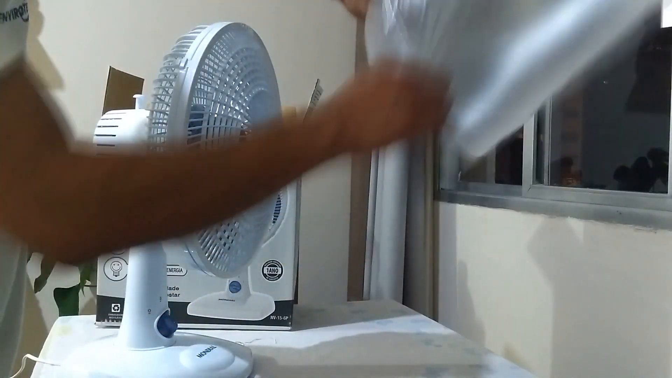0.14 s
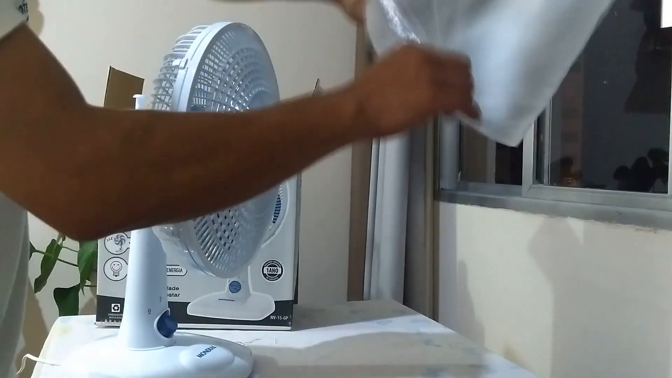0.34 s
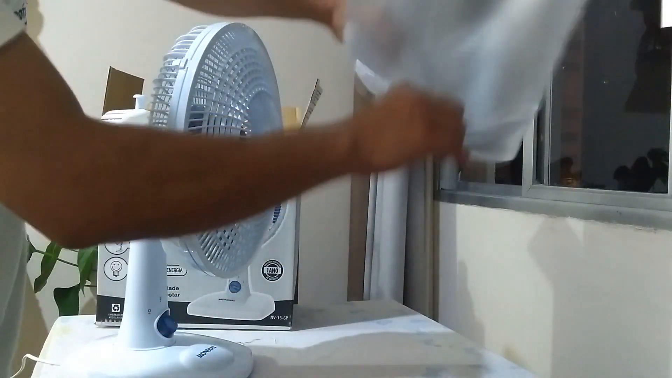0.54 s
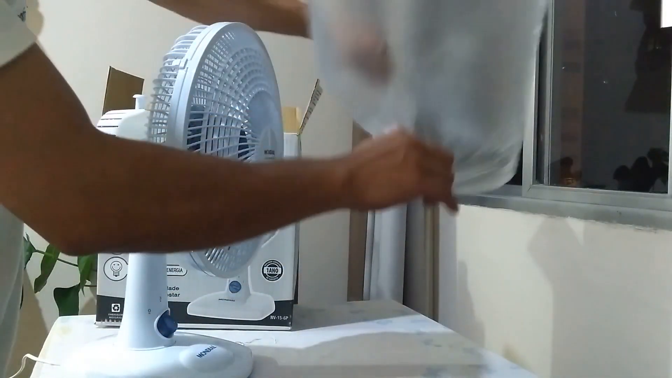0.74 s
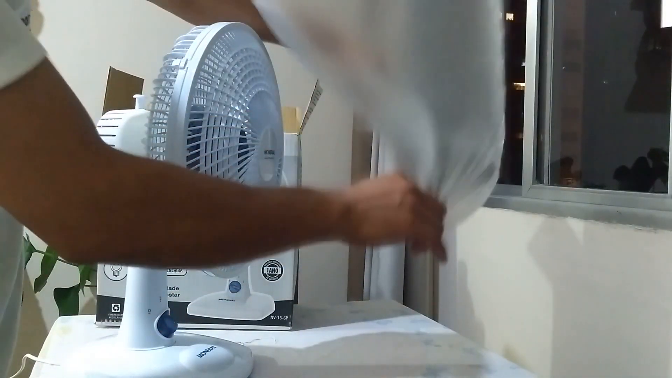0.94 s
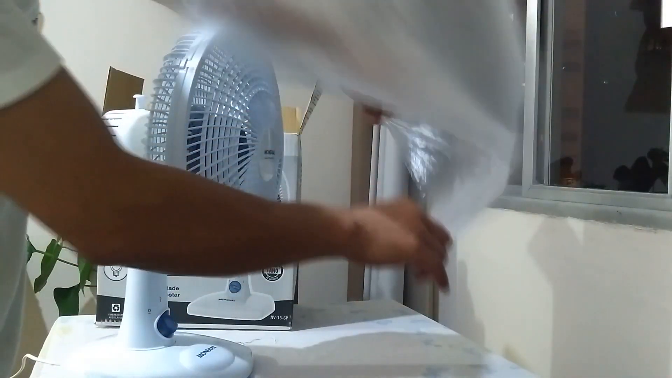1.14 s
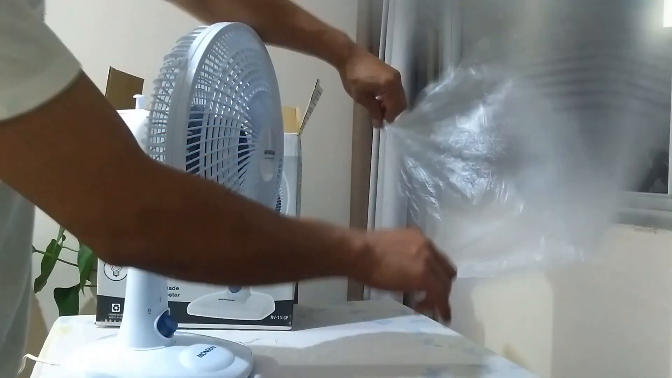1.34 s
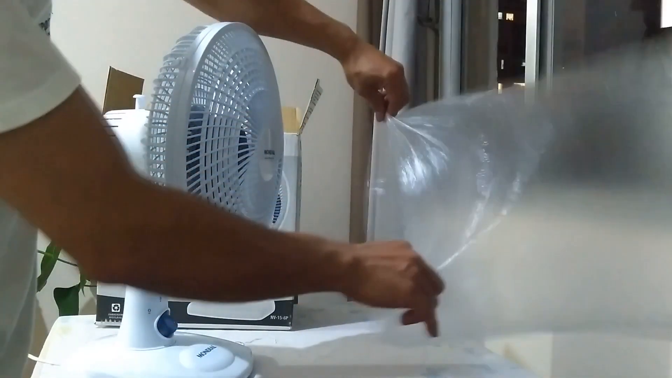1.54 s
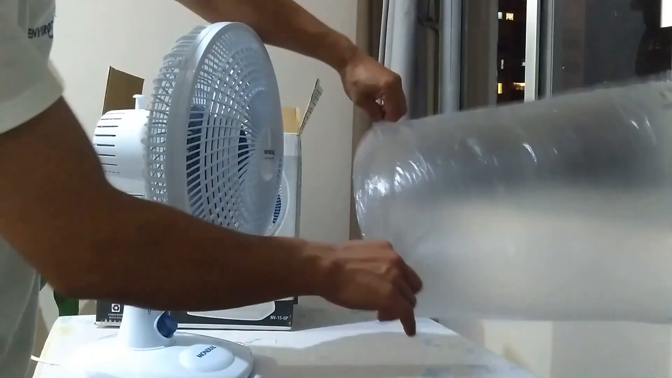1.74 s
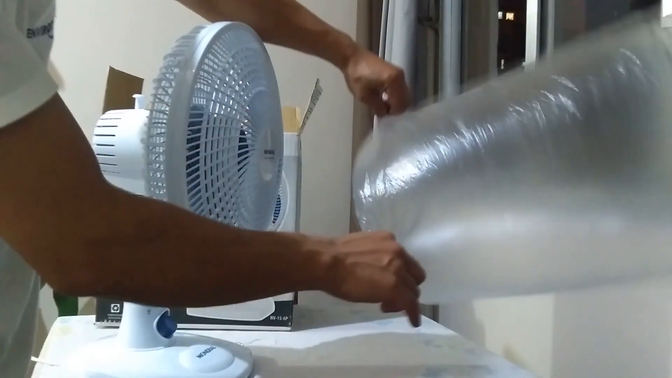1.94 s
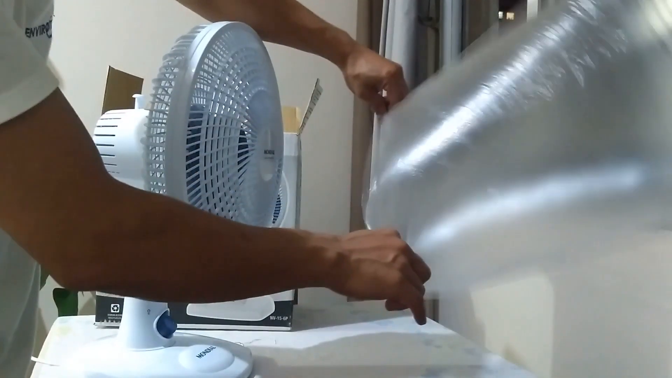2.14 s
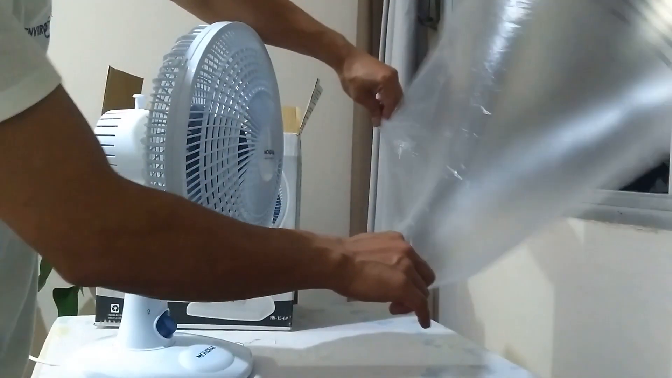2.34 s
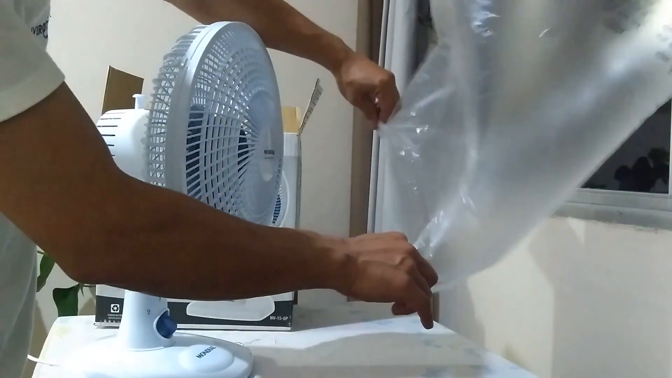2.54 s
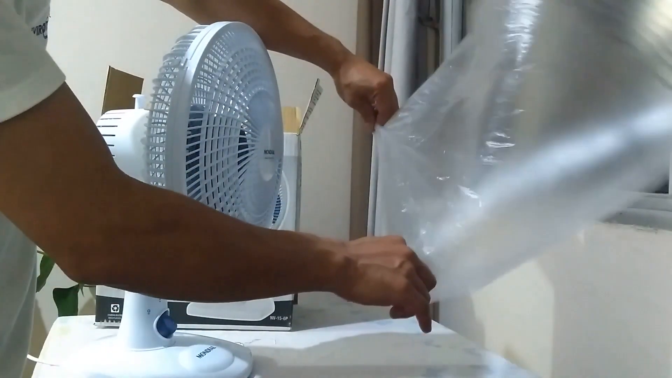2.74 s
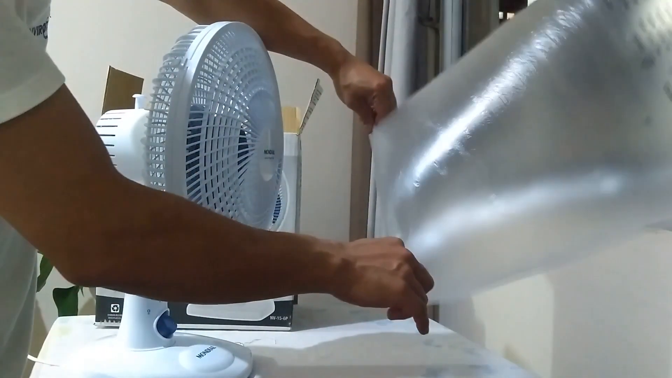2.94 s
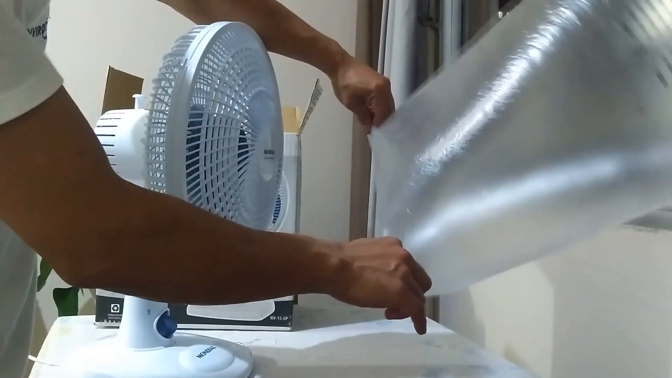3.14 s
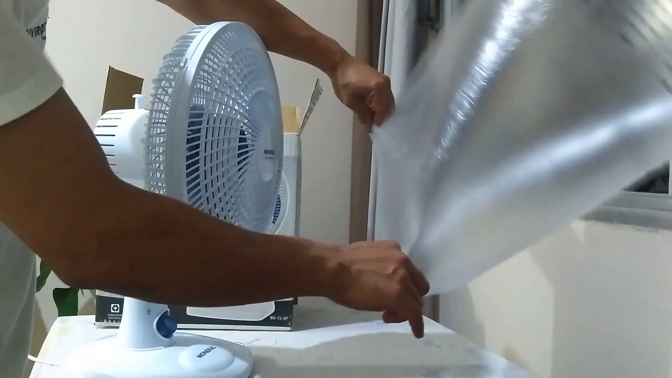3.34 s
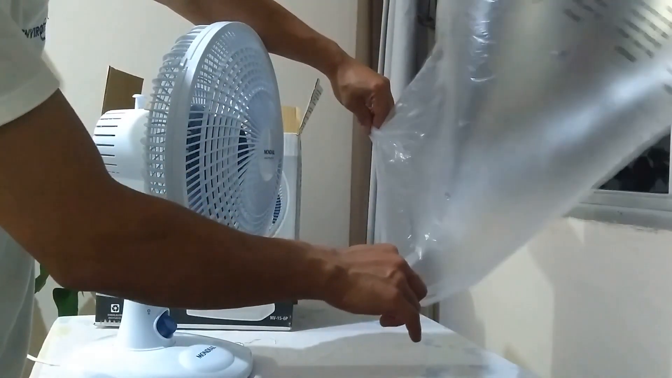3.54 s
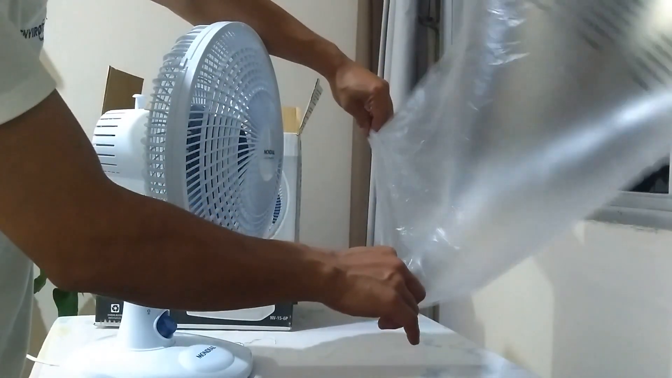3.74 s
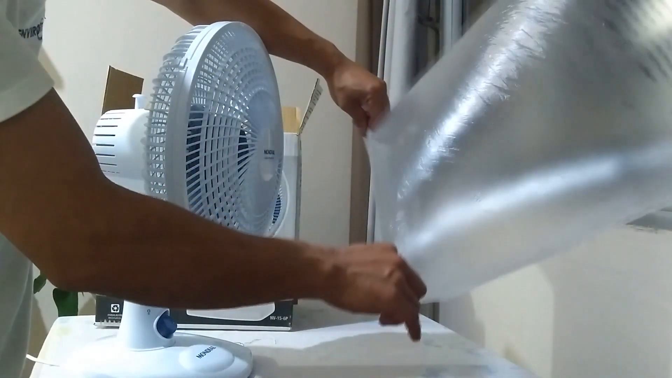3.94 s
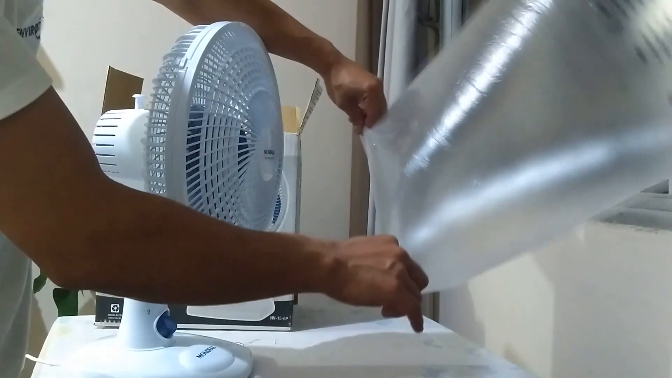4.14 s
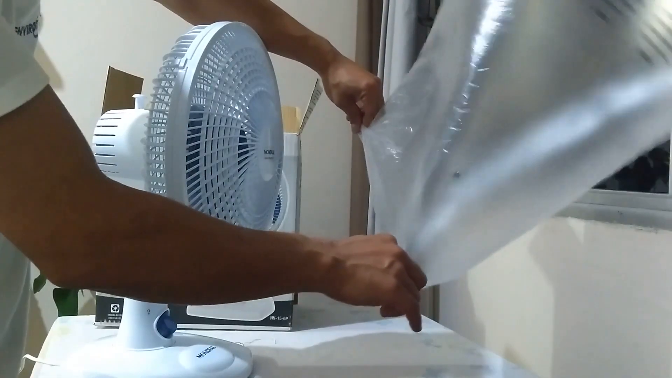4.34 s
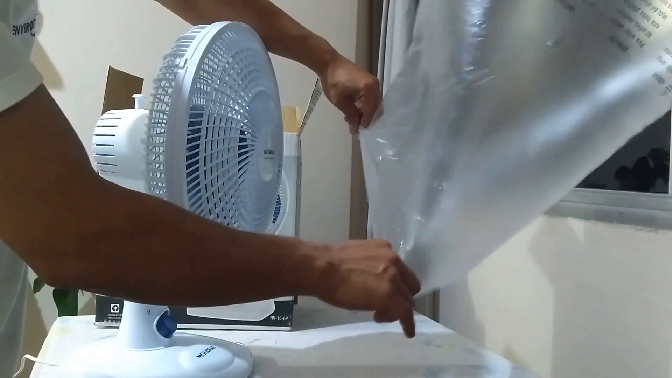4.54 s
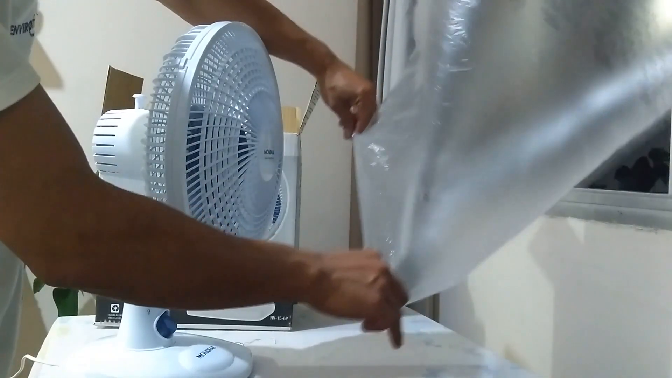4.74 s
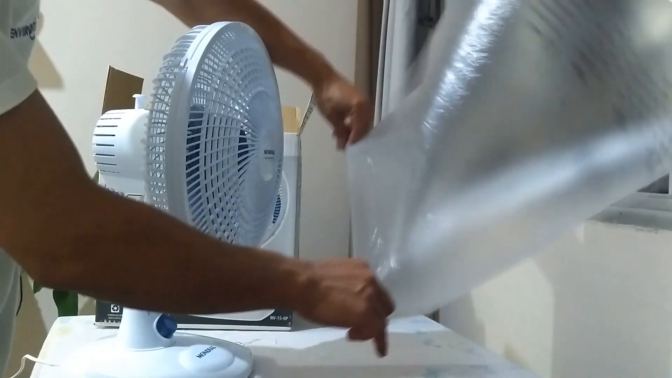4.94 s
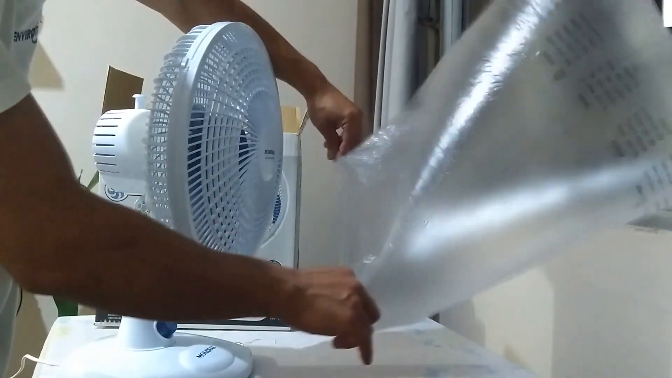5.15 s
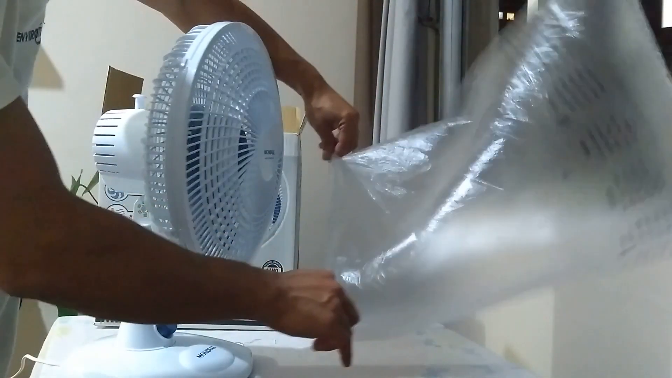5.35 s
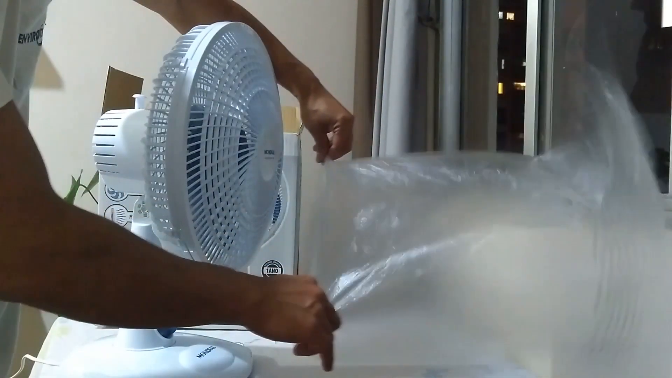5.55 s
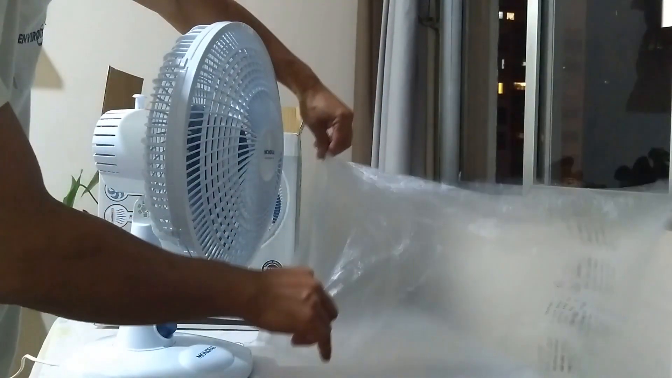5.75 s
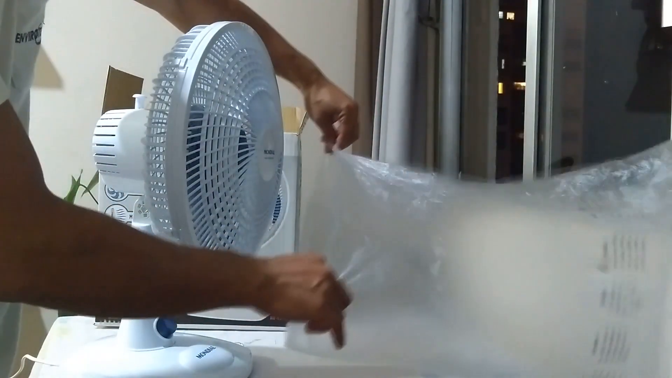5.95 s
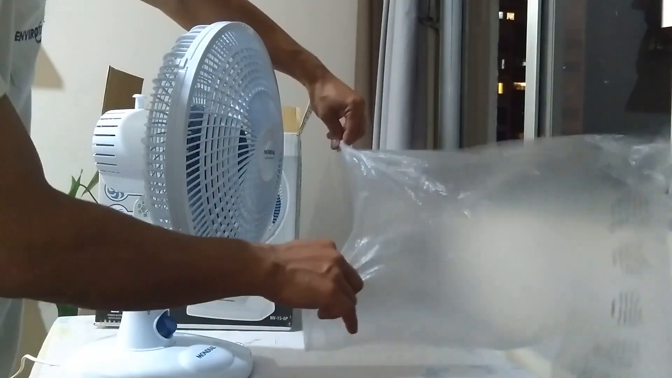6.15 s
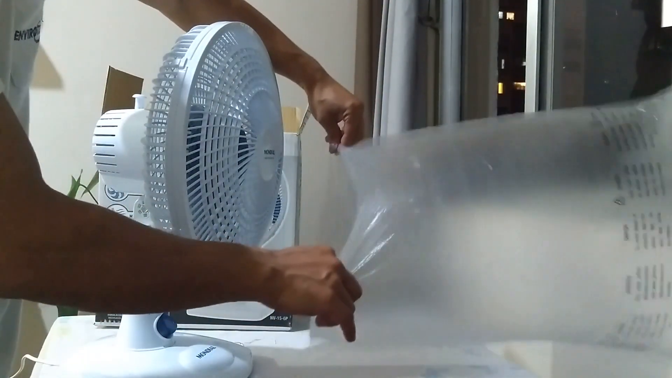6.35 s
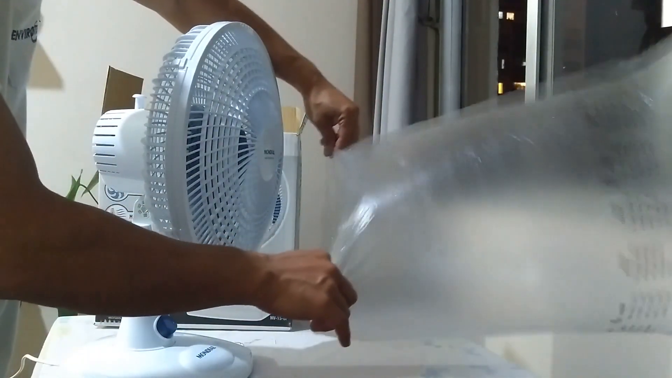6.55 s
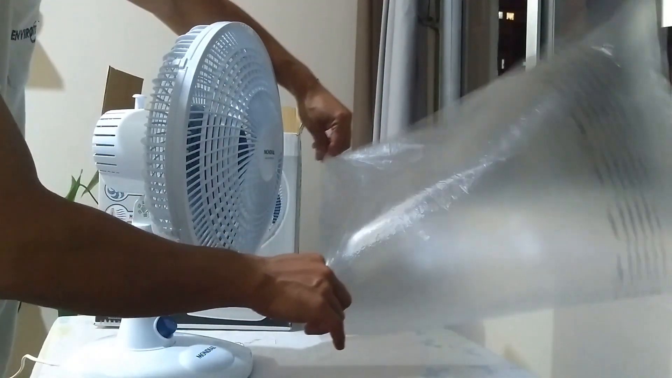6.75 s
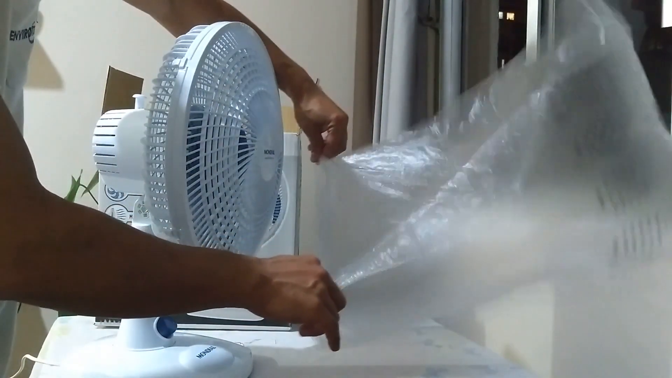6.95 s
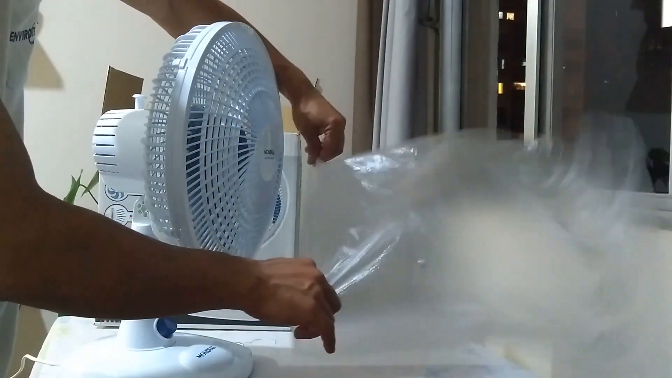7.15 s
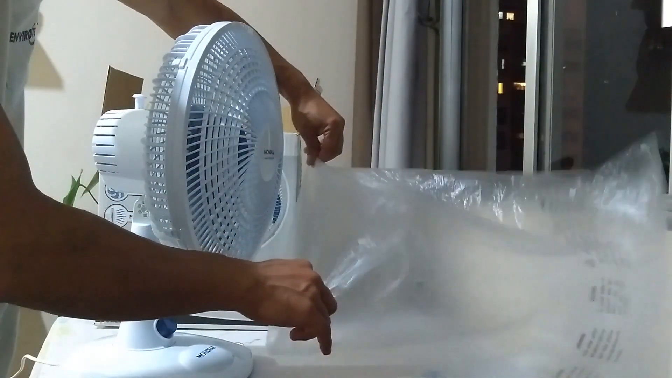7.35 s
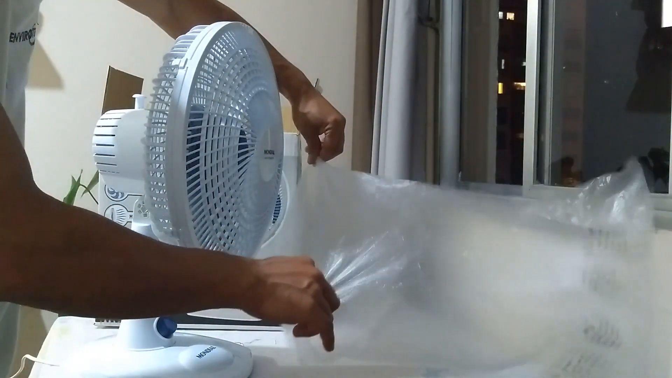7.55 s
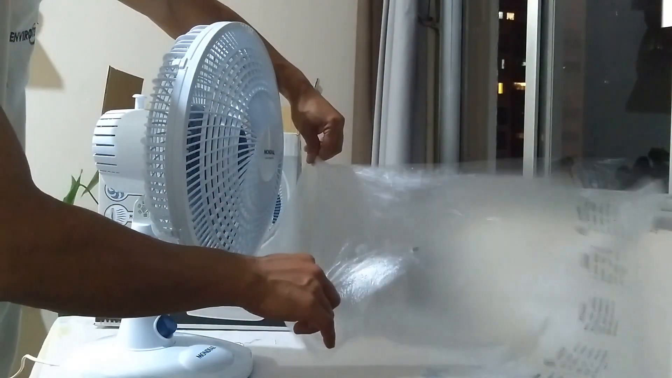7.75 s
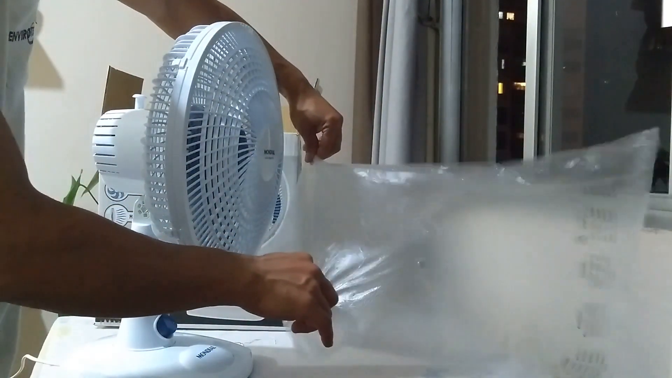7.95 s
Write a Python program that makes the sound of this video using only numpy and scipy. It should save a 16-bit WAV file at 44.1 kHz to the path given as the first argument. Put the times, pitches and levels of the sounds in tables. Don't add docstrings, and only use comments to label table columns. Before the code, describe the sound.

In a small room, a desk fan at full speed makes a constant airy rush and low blade hum. Close by, hands stretch a thin plastic bag in the draught: bright crinkling, a big billowing burst early on, lighter flutter, then a very sharp snap near the end. A distant motorbike revs faintly outside. Wide stereo, close microphone.

```python
import sys
import numpy as np
from scipy import signal
from scipy.fft import rfft, irfft, next_fast_len
from scipy.io import wavfile
from scipy.ndimage import uniform_filter1d

SR = 44100
rng = np.random.default_rng(int(sys.argv[2]) if len(sys.argv) > 2 else 0)


def magnitude_from_level(level_db):
    exponent = np.asarray(level_db, float) / 20
    return 10 ** exponent


def master_out(mix):
    frames = np.transpose(np.atleast_2d(mix))
    ceiling = np.clip(frames, -1, 1)
    pcm = np.round(ceiling * 32767).astype(np.int16)
    wavfile.write(sys.argv[1], SR, pcm)


N = 353285

# peak t/s, extra rustle level/dB, rise t/s, fall t/s
BILLOWS = [(.15, 9, 0.073, .07), (.36, 5, 0.027, 0.043), (.45, 8, 0.031, 0.087), (.67, 4.5, 0.064, .09),
           (1.38, 4, 0.036, 0.041), (1.59, 22, 0.14, 0.42), (1.65, 24.5, 0.17, 0.19), (1.76, 20, .3, .08),
           (2.25, 3, 0.3, 0.033), (2.97, 4, .05, 0.15), (3.68, 2.5, 0.053, .15), (3.41, 8.5, 0.12, 0.21),
           (3.9, 9.5, .021, 0.098), (4.01, 4.5, .06, 0.049), (4.4, 1.5, .07, 0.11), (4.53, 5, 0.16, 0.032),
           (4.86, 1.5, .1, 0.042), (5.06, 3.5, 0.12, 0.11), (5.47, 6, 0.06, 0.065), (5.78, 12.5, .3, 0.9),
           (6.0, 15, .3, 0.29), (6.38, 8.5, 0.42, 0.23), (7.09, 5.5, 0.1, 0.2), (7.46, 3, 0.45, 0.1),
           (7.72, 2, .09, .05), (7.94, 6.5, 0.096, 0.12)]
# f/Hz, likeness (0 to 1)
PORT_SAME = [(30, 0.92), (60, 0.94), (250, 0.9), (500, 0.81), (1000, 0.26), (1800, 0.31), (4000, 0.16)]
# f/Hz, left over right level/dB
PORT_LEFT = [(60, 0), (500, 3), (1800, -6.5), (3700, -2), (4700, -7.5), (6500, -8), (9000, -3.5),
             (14000, -2.5)]


def evened(x):
    return x / np.sqrt(np.mean(x ** 2) + 1e-20)


def read(points, hz):
    f, value = np.transpose(points)
    return np.interp(np.log(hz + 1), np.log(f + 1), value)


def curve(rows):
    s, *columns = np.transpose(rows)
    return [np.interp(np.arange(N) / SR, s, c) for c in columns]


def bumps(rows, t):
    s, db, rise, fall = np.transpose(rows)[..., None]
    rising, falling = 1 + (t - s) / rise, 1 - (t - s) / fall
    return (db * np.clip(np.minimum(rising, falling), 0, 1)).max(0)


def colour(x, points):
    size = next_fast_len(N + 4096)
    gain = magnitude_from_level(read(points, np.fft.rfftfreq(size, 1 / SR)))
    return irfft(rfft(x, size) * evened(gain), size)[..., :N]


def wander(rate_hz, channels=1):
    lowpass = signal.butter(2, rate_hz, fs=SR, output="sos")
    return evened(signal.sosfilt(lowpass, rng.standard_normal((channels, N))))


def creases(per_s, spread_db, low_hz, high_hz, cycles):
    happens = None
    size = magnitude_from_level(spread_db * np.minimum(rng.exponential(1, N), 5)) * (rng.random(N) < per_s / SR)
    kind, sign, out = rng.integers(0, 10, N), rng.choice([-1., 1.], (2, N)), np.zeros((2, N))
    t = np.arange(400) / SR
    for k, hz in enumerate(np.geomspace(low_hz, high_hz, 10)):
        burst = np.sin(2 * np.pi * hz * t) * np.exp(-t * hz / cycles) * (1 - np.exp(-t * hz * 3.3))
        burst = burst / np.linalg.norm(burst) * np.sqrt(hz)
        out += signal.oaconvolve(size * (kind == k) * sign, burst[None], axes=1)[:, :N]
    return evened(out)


def cracks():
    # t/s, peak level/dB, low ring f/Hz
    flips = [(1.5654, -18, 700), (1.5883, -22, 1290), (1.5984, -12, 970), (1.6520, -15, 300),
             (2.9629, -24, 1020), (3.9038, -17, 910), (4.0185, -25, 1200), (6.3225, -22, 845),
             (7.0963, -19, 1500), (7.1039, -6.5, 1710), (7.109, -27, 1400), (7.4346, -19, 1450)]
    out, t = np.zeros((2, N)), np.arange(300) / SR
    bright = .6 * np.sin(2 * np.pi * 5600 * t) * np.exp(-t / .0007)
    for s, db, hz in flips:
        ring = np.sin(2 * np.pi * hz * t) * np.exp(-t / .0011) + bright
        out[:, round(s * SR):][:, :300] += magnitude_from_level(db) * ring * [[1], [.8]]
    return out


def room(x, wet_db):
    # f/Hz, t60/s
    decay = [(200, 0.37), (1000, 0.19), (4000, 0.09), (12000, 0.18)]
    taps = np.zeros((3, 2, SR // 4))
    at = np.arange(100, SR // 4 - 20, 20) + rng.integers(0, 20, (3, 2, (SR // 4 - 101) // 20))
    np.put_along_axis(taps, at, rng.choice([-1., 1.], at.shape), 2)
    hz, t, z = signal.stft(taps, SR, nperseg=256)
    tails = signal.istft(z * magnitude_from_level(-60 * t / read(decay, hz)[:, None]), SR, nperseg=256)[1]
    tails = tails / np.linalg.norm(tails[0, 0])
    turn = 2 * np.pi * (2.3 * np.arange(N) / SR + np.arange(3)[:, None, None] / 3)
    wet = signal.fftconvolve(x * np.cos(turn) * np.sqrt(2 / 3), tails, axes=2).sum(0)[:, :N]
    return (x + magnitude_from_level(wet_db) * wet) / np.sqrt(1 + magnitude_from_level(2 * wet_db))


def bag():
    # t/s, level/dB
    rustle = [(0.0, -39), (0.3, -49), (0.76, -50.5), (0.89, -39.5), (1.43, -40.5), (1.85, -56),
              (2.12, -50.5), (2.45, -38), (2.92, -38.5), (3.2, -44), (3.6, -41.5), (4.2, -41.5),
              (4.95, -41.5), (5.3, -37), (6.17, -41.5), (7.0, -37), (7.63, -34.5), (8.01, -32)]
    # t/s, peak level/dB, low slap against crinkle level/dB
    snaps = [(0.1654, -12, 3), (0.3451, -22.5, -15), (0.4444, -20.5, -2.5), (0.4744, -20, 7),
             (1.065, -17, -4), (1.265, -16.5, -3), (1.3714, -14.5, -2), (1.5344, -15, 6), (1.5944, -5, 7.5),
             (2.634, -19.5, 10.5), (2.939, -19.5, 15), (2.9694, -15.5, 9.5), (3.9064, -18, 11),
             (3.9754, -22.5, 7), (4.0194, -20.5, 8), (4.3944, -21, 4), (4.7257, -15.5, 8.5),
             (5.0544, -20.5, 10), (5.2367, -17.5, 9), (5.4523, -14.5, 10.5), (5.7694, -18, 8),
             (6.321, -17, 7.5), (6.3694, -15, 2), (6.7214, -25, 1), (6.8994, -14.5, 1), (7.102, -1.5, -1),
             (7.436, -13.5, 9), (7.5244, -17, -1), (7.7144, -23, -10), (7.9344, -23, 9)]
    # f/Hz, density level/dB per Hz
    crinkle_spectrum = [(900, -17.5), (1600, -15.5), (2400, -7.5), (3200, -9.5), (4000, -7), (5000, -1.06),
                        (6500, -4.5), (8000, -10), (10000, -16.5), (12500, -20.5), (15000, -26)]
    # f/Hz, density level/dB per Hz
    fold_spectrum = [(120, -20), (300, -8.5), (500, -5), (800, -8), (1400, -0.3), (2200, -4), (3500, -9.5),
                     (6000, -12.5)]
    t = np.arange(N) / SR
    steady_db, billow_db = curve(rustle)[0], bumps(BILLOWS, t)
    level_db = steady_db + billow_db
    body_db = 0.2 - 0.59 * (steady_db + 40.5) - 0.43 * billow_db
    flutter = magnitude_from_level(1.0 * wander(9.2)[0] + 1.0 * wander(35)[0])
    fine_power = (magnitude_from_level(level_db + 2.5) * flutter) ** 2
    low_power = (magnitude_from_level(level_db + body_db - 8.0) * flutter) ** 2
    for s, db, slap_db in snaps:
        t60_s = .1 - 0.23 * (db + 20.5)
        at = slice(max(round((s - .05) * SR), 0), round((s + .3) * SR))
        u = t[at] - s
        clump = np.where(u < 0, magnitude_from_level(60 * u / 0.062), magnitude_from_level(-60 * u / max(t60_s, .02))) * magnitude_from_level(db - 12.5)
        fine_power[at] += clump ** 2
        low_power[at] += (clump * magnitude_from_level(slap_db - 13.0)) ** 2
    crinkle = np.sqrt(fine_power) * colour(creases(14000, 1.3, 1510, 15780, 0.65), crinkle_spectrum)
    folds = np.sqrt(low_power) * colour(creases(3500, 2.42, 201.0, 4800, 0.89), fold_spectrum)
    return room(crinkle + folds + cracks(), wet_db=-1.5)


def fan():
    # t/s, level/dB
    draught = [(0.0, -46), (0.71, -49.5), (1.25, -46), (1.85, -48.5), (2.07, -51), (2.45, -44.5),
               (2.79, -46), (3.5, -44.5), (4.86, -44.5), (5.5, -43), (6.18, -45.5), (6.45, -43),
               (6.94, -43), (7.34, -47.5), (7.58, -45), (8.01, -42)]
    # f/Hz, density level/dB per Hz
    rush = [(22, -45), (33, -28), (46, 3), (70, -37), (100, 6), (200, -3.5), (400, -1), (560, -9.5),
            (680, 0.5), (820, -0.5), (1000, -6), (2500, -9), (6000, -14.5), (14000, -40.5)]
    # f/Hz, width f/Hz, level against the rush/dB
    hums = [
        (70, 14, -14),
        (744, 5, -17),
    ]
    # deepest t/s, loss level/dB, fall t/s, recovery t/s
    shields = [(0.0, 11, .05, .11), (.24, 9, .13, 0.11), (.5, 2.5, 0.23, .1), (.67, 14.5, 0.17, .6),
               (1.67, 6.5, 0.37, 0.44), (2.07, 29, 0.13, 0.11), (2.77, 2, 0.097, 0.11),
               (3.03, 2, 0.093, 0.26), (4.13, 4, 0.11, 0.5), (5.02, 6, 0.25, .1), (5.24, 15, 0.18, 0.16),
               (5.6, 1.5, 0.49, 0.33), (6.27, 0.5, 0.096, 0.17), (6.7, 5, 0.21, .1), (6.87, 34, .18, .11),
               (7.2, 8, 0.23, 0.82), (7.54, 1, .3, 0.58)]
    blade_hz, blade_db, blade_follows = 137.9, -44, 0.68
    spill = 0.21
    t = np.arange(N) / SR

    a, b, c, d, patches = rng.standard_normal((N // 256 + 5, 513, 5)).T
    patches = evened(uniform_filter1d(uniform_filter1d(patches, 10, 0), 12, 1))
    hz = np.fft.rfftfreq(1024, 1 / SR)
    z = np.array([a + 1j * b, c + 1j * d]) * magnitude_from_level(read(rush, hz)[:, None] + 1.3 * patches)
    air = evened(signal.istft(z, nperseg=1024, noverlap=768)[1][:, :N])
    for f_hz, width_hz, db in hums:
        i, q = wander(width_hz / 2, channels=2)
        air[0] += magnitude_from_level(db) * (i * np.cos(2 * np.pi * f_hz * t) + q * np.sin(2 * np.pi * f_hz * t))

    draught_db = curve(draught)[0]
    eddy_db = .8 * wander(6.6)[0]
    air *= magnitude_from_level(draught_db + spill * bumps(BILLOWS, t) + 5.5 + eddy_db)
    tone_db = blade_db + blade_follows * (draught_db - draught_db.max()) - bumps(shields, t) + 8.5
    air[0] += magnitude_from_level(tone_db) * np.sin(2 * np.pi * blade_hz * t + 0.63 * wander(4.0)[0])
    return air


def motorbike():
    # t/s, firing rate f/Hz, level/dB, extra boom of low orders level/dB
    revs = [
        [(5.35, 56, -62, 0), (5.52, 56, -51, 8), (5.7, 56.5, -54, 3), (5.9, 57, -54, 2), (6.2, 57.5, -57, 0),
         (6.45, 59, -49, -8), (6.9, 61, -60, -4)],
        [(7.26, 98.5, -56, -11), (7.36, 100.2, -50, -9), (7.53, 103.5, -49, -6), (7.65, 105.7, -48.5, 5),
         (7.85, 108, -49, 2), (8.01, 110, -47, -3)],
    ]
    # f/Hz, level/dB
    exhaust = [(60, -22), (105, -11), (170, -2), (215, -3), (235, -9), (300, -7), (345, -13), (395, -3),
               (435, -2), (470, -9), (700, -34)]
    out, t = np.zeros((2, N)), np.arange(N) / SR
    for rows in revs:
        hz, db, boom_db = curve(rows)
        turns = np.cumsum(hz) / SR
        on = (t > rows[0][0]) & (t < rows[-1][0])
        for k in range(1, 9):
            order_db = read(exhaust, k * hz) + db + boom_db * (k * hz < 250)
            fading = magnitude_from_level(order_db + 1.2 * wander(5)[0])
            phase = 2 * np.pi * (k * turns + rng.random())
            out += on * fading * np.array([1.6 * np.sin(phase), .9 * np.sin(phase + .6)])
    return out


def scene():
    size = next_fast_len(N + 4096)
    hz = np.fft.rfftfreq(size, 1 / SR)
    first, second = rfft(bag() + fan() + motorbike(), size)
    same, lean = np.clip(read(PORT_SAME, hz), 0, 1), magnitude_from_level(read(PORT_LEFT, hz) / 2)
    left = first * lean
    right = (same * first + np.sqrt(1 - same ** 2) * second) / lean
    return irfft(np.array([left, right]), size)[:, :N]


def widened(dry):
    # f/Hz, share (0 to 1)
    cross_share = [(60, .97), (1200, .74), (2000, .86), (2450, .8), (3650, .64), (4100, .58), (4700, .48),
                   (6500, .4), (8500, .27), (11500, .24), (12700, .28), (14000, .05)]
    # f/Hz, delay t/s
    cross_delay = [(3700, .00041), (5000, .0004), (12700, .000394)]
    size = next_fast_len(N + 4096)
    hz = np.fft.rfftfreq(size, 1 / SR)
    ports, share = rfft(dry, size), np.clip(read(cross_share, hz), 0, .995)
    late = share * np.exp(-2j * np.pi * hz * read(cross_delay, hz))
    same, lean = np.clip(read(PORT_SAME, hz), 0, 1), magnitude_from_level(read(PORT_LEFT, hz))
    power = (lean + 1 / lean) / 2 * (1 + share ** 2) - 2 * same * late.real
    in_band = hz < 14280
    return irfft((ports - late * ports[::-1]) / np.sqrt(power) * in_band, size)[:, :N]


def gain_control(x, knee_db, slope, recover_db_s):
    power_db = 10 * np.log10(abs(signal.lfilter(np.ones(600) / 600, 1, (x ** 2).mean(0))) + 1e-12)
    fall = np.arange(N) * recover_db_s / SR
    held_db = np.maximum.accumulate(power_db + fall) - fall
    over_db = np.maximum(held_db - knee_db, 0)
    return x / magnitude_from_level(slope * signal.lfilter(np.ones(300) / 300, 1, over_db))


def joint_stereo(x):
    # f/Hz, level/dB
    drop_depth = [(800, -30), (1230, -14), (1800, -16), (2150, -7), (2700, -9.5), (3400, -13), (5000, -15),
                  (8000, -10), (10000, -5), (11500, -10), (13000, -5), (14000, -20)]
    # peak t/s, shortage level/dB, rise t/s, fall t/s
    starved = [(.95, 14, .3, .22), (1.3, 10, .15, .15), (1.9, 4, .15, .25), (4.05, 9, .12, .25),
               (6.0, 6, .2, .3), (6.95, 6, .25, .12), (7.25, 6, .12, .6)]
    frame = dict(window="cosine", nperseg=2048, noverlap=1024)
    hz, t, z = signal.stft(np.array([x[0] + x[1], x[0] - x[1]]) / 2, SR, **frame)
    power = (abs(z[:, :1024]) ** 2).reshape(2, 128, 8, -1).sum(2)
    drift = uniform_filter1d(rng.standard_normal(power.shape), 4, 2)
    short_db = 3.5 * evened(uniform_filter1d(drift, 3, 1))
    short_db[0, :20] += np.minimum(bumps(starved, t), 7) - 1
    keep = power > power[::-1] * magnitude_from_level(2 * (read(drop_depth, hz[4:1024:8])[:, None] + short_db))
    z[:, :1024] *= np.repeat(keep, 8, axis=1)
    mid, side = signal.istft(z, SR, **frame)[1][:, :N]
    return np.array([mid + side, mid - side])


def low_pass(x):
    return signal.sosfilt(signal.butter(12, 15410, fs=SR, output="sos"), x)


def record(dry):
    ducked = gain_control(widened(dry), knee_db=-26.0, slope=.7, recover_db_s=25.0)
    return low_pass(joint_stereo(ducked))


dry = scene()
out = record(dry)
master_out(out)
```